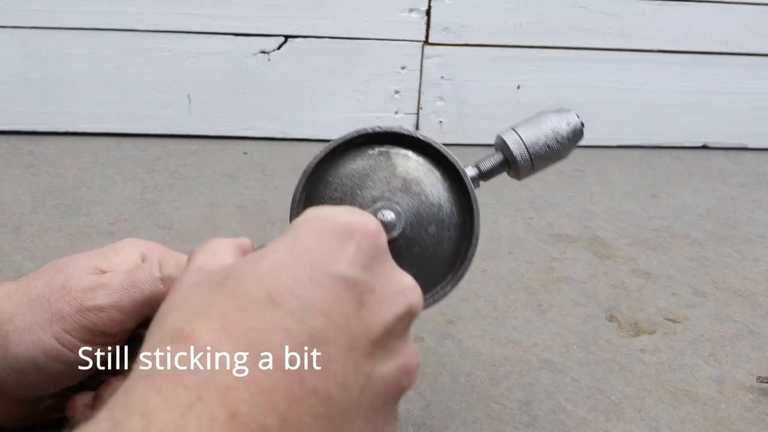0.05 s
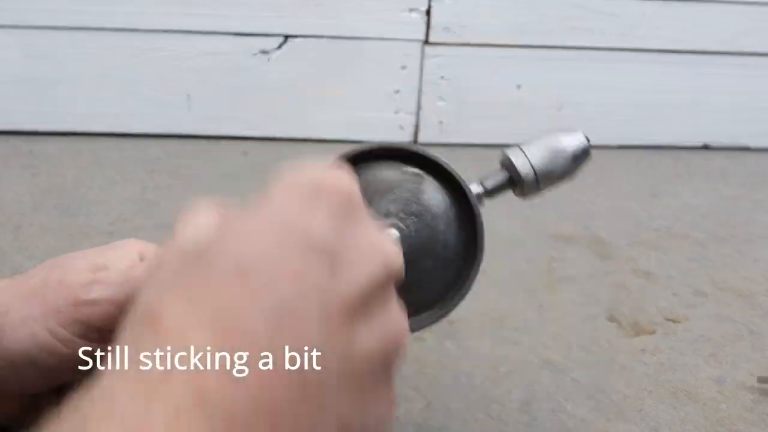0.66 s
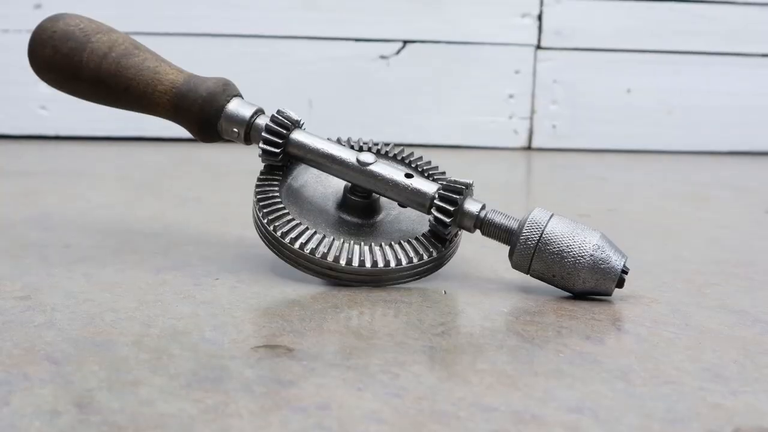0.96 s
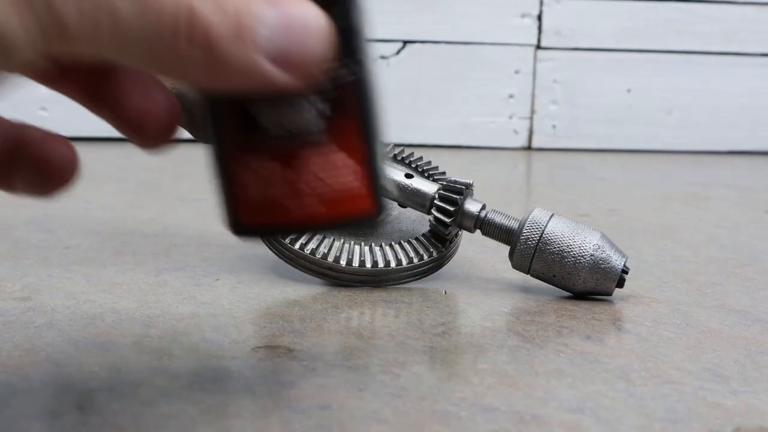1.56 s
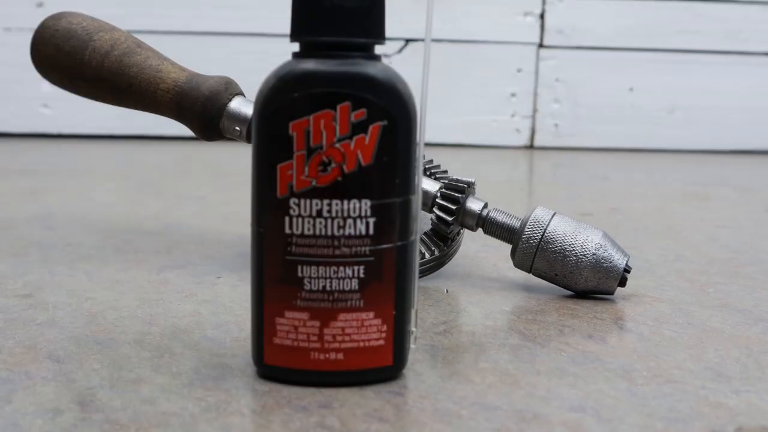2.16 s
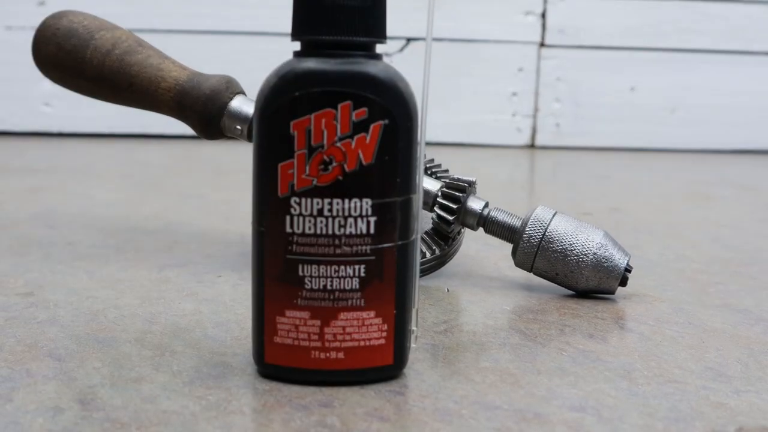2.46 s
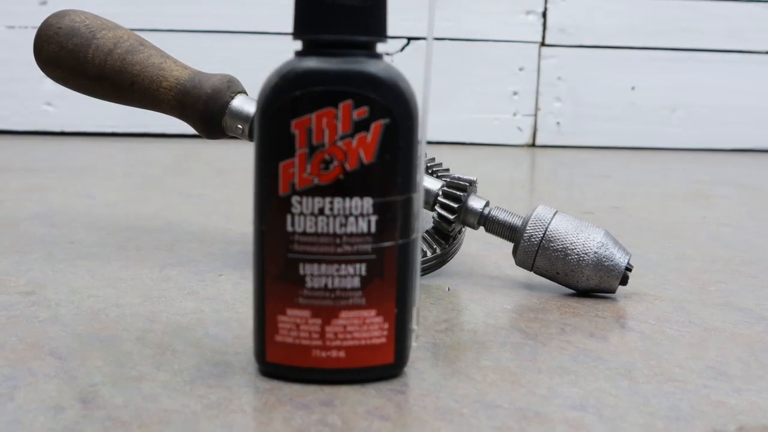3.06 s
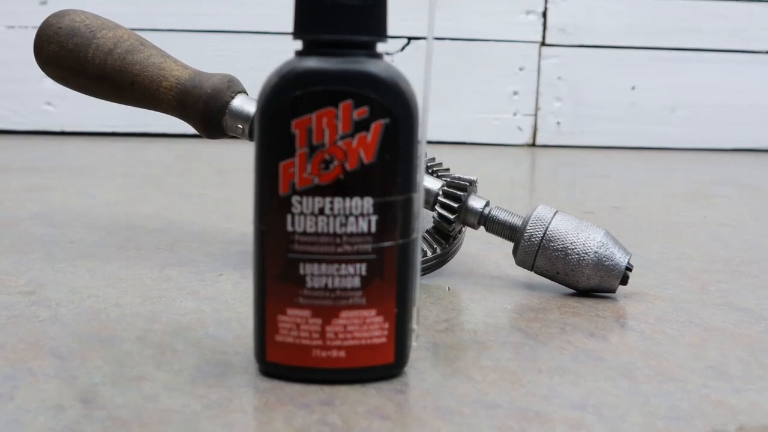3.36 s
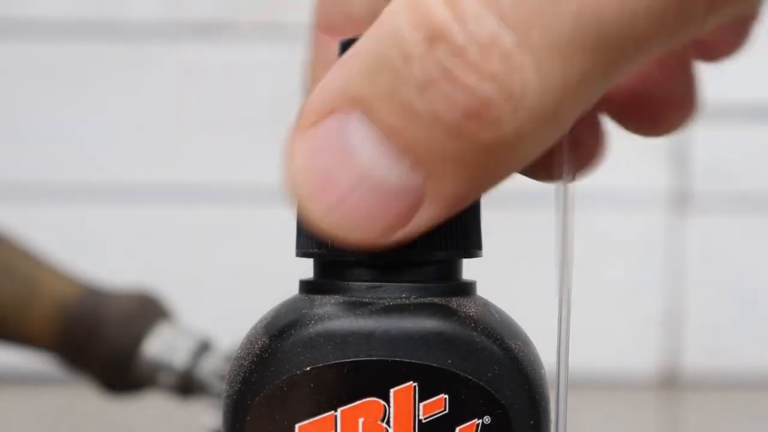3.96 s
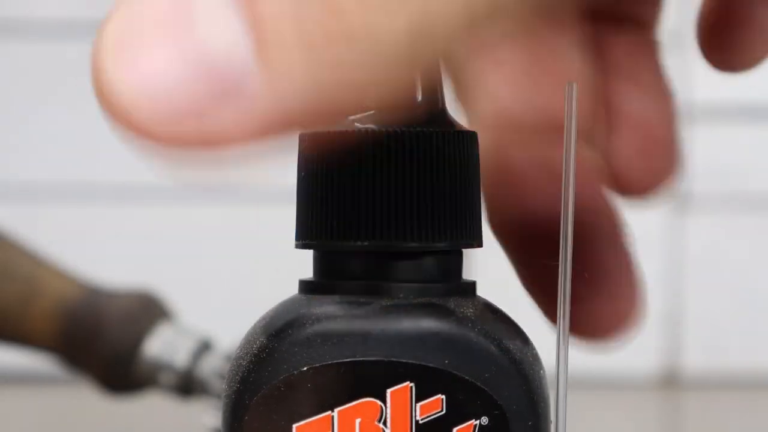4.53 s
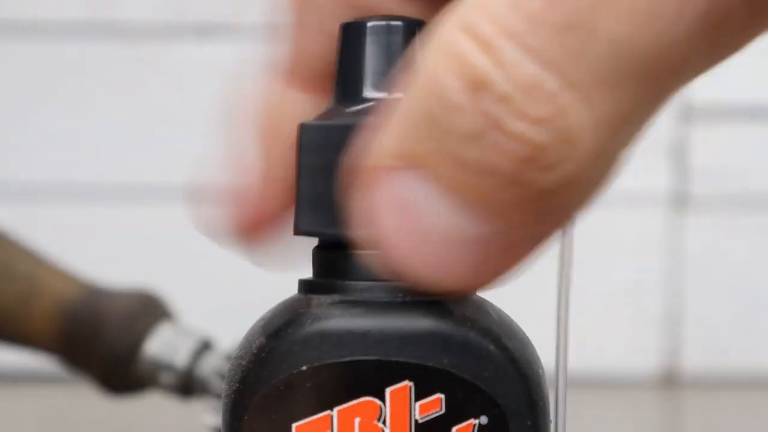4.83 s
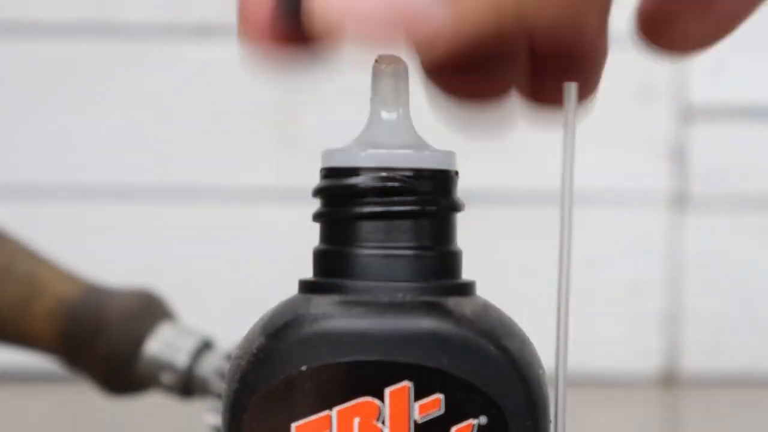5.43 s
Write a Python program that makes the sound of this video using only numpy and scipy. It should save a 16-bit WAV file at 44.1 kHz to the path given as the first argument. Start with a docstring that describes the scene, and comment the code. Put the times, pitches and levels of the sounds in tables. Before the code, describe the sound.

Close by, the gears of a sticky hand drill whir and clatter for about half a second, with thin squeaks, and stop suddenly. Soft taps come next, then the solid knock of a filled plastic bottle landing on a bench. Fingers then unscrew its cap with a run of short hissing scrapes and small plastic clicks, over a low electrical hum and the faint hiss of a small, quiet room.

```python
"""In a small workshop, a sticky hand drill is cranked up close: its bevel gears rattle and squeak,
until the drill sound cuts off abruptly and the background hiss steps up. After a few faint handling
noises a plastic oil bottle is set down on a hard bench, its body and thin wall ringing as it rocks.
A hand grips it, a mains hum sets in, and the fingers spin the ribbed cap off in quick flicks,
skin hissing on the ribs and the cap clicking."""
import sys
import numpy as np
from scipy import signal
from scipy.fft import rfft, irfft, next_fast_len
from scipy.io import wavfile
from scipy.ndimage import map_coordinates

SR = 44100
rng = np.random.default_rng(int(sys.argv[2]) if len(sys.argv) > 2 else 0)


def store_pcm(level_fs):
    """Save levels as 16-bit WAV."""
    pcm = np.round(np.clip(level_fs, -1, 1) * 32767).astype(np.int16)
    wavfile.write(sys.argv[1], SR, np.atleast_2d(pcm).T)


N = 246519
TIME = np.arange(N) / SR
AGE = TIME[:SR // 3]  # seconds since a hit
CUT_S, GRIP_S = 0.758, 3.53

# Tone of a hard contact. Each row: frequency in Hz, gain in dB.
TICK_EQ = [(30, -42.5), (200, -15), (1000, 7), (4000, -0.5), (7000, -6.5), (9000, -9.5), (11500, 0),
           (16000, -16)]
# Tone of the workshop's reverb. Each row: frequency in Hz, gain in dB.
ROOM_EQ = [(60, -8.5), (300, 1), (600, 4.5), (1200, 1.5), (2400, 0.5), (4500, -4.5), (7000, -7),
           (8500, -13.5), (15000, -23)]


def amp(db):
    """Decibels to gain."""
    return 10 ** (np.asarray(db) / 20)


def unit(x):
    """Scale to rms 1."""
    return x / np.sqrt(np.mean(x ** 2) + 1e-20)


def noise(samples=N):
    """White noise."""
    return rng.standard_normal(samples)


def along(points, hz):
    """Read (Hz, value) points on a log frequency axis."""
    freqs, values = np.transpose(points)
    return np.interp(np.log(hz + 1), np.log(freqs + 1), values)


def add(track, start, sound):
    """Mix a sound into the track at start seconds."""
    part = track[round(start * SR):][:len(sound)]
    part += sound[:len(part)]


def filtered(x, response):
    """Apply a complex frequency response."""
    size = 2 * next_fast_len(len(x) // 2 + 8192)
    return irfft(rfft(x, size) * response(np.fft.rfftfreq(size, 1 / SR)), size)[:len(x)]


def eq(x, points):
    """Minimum-phase EQ through (Hz, dB) points."""
    def response(hz):
        cepstrum = irfft(np.log(amp(along(points, hz))))
        half = len(cepstrum) // 2
        return np.exp(rfft(np.r_[cepstrum[0], 2 * cepstrum[1:half], np.zeros(half)]))
    return filtered(x, response)


def resonant(x, modes):
    """Parallel (Hz, width in Hz, dB) resonances of alternating polarity."""
    return filtered(x, lambda f: sum((-1) ** k * amp(db) * 1j * f * bw / (hz * hz - f * f + 1j * f * bw)
                                     for k, (hz, bw, db) in enumerate(modes)))


def impacts(rate, scatter, spread_db, life):
    """Noise bursts of uneven size and timing, rate a second, each decaying over life seconds."""
    beats = np.flatnonzero(np.diff(np.floor(np.cumsum(rate) / SR)))
    timing, strength = rng.standard_normal((len(beats), 2)).T
    hits = np.clip(beats + scatter * timing * SR / rate[beats], 0, N - 1).astype(int)
    sizes = np.bincount(hits, amp(spread_db * np.clip(strength, -2, 2)), N)
    envelope = signal.lfilter([1], [1, -np.exp(-1 / (life * SR))], sizes)
    return unit(envelope * noise())


def ring(modes, vary_db):
    """One blow on (Hz, dB, T60) modes, each at a random strength; peak 1."""
    x = sum((-1) ** k * amp(db + vary_db * rng.normal() - 60 * AGE / t60) * np.sin(2 * np.pi * hz * AGE)
            for k, (hz, db, t60) in enumerate(modes))
    return x / np.abs(x).max()


def crack(tone, life):
    """A sharp blow drives many close modes about equally hard, and they die together."""
    spectrum = rfft(noise(len(AGE)) * np.exp(-AGE / life))
    flat = irfft(spectrum / np.abs(spectrum), len(AGE)) * np.exp(-AGE / (10 * life))
    burst = eq(flat, tone)
    return burst / np.sqrt(np.sum(burst ** 2)) * np.sqrt(life * SR / 8)


def room(x):
    """The workshop's reverb: each frequency dies at its own speed."""
    # Reverb decay. Each row: frequency in Hz, T60 in seconds.
    decay = [(100, 0.74), (400, 0.46), (1000, 0.5), (2500, 0.49), (5000, .38), (12000, 0.251)]
    hz, t, bands = signal.stft(noise(SR * 2 // 3), SR, nperseg=256)
    tail = signal.istft(bands * amp(-60 * t / along(decay, hz)[:, None]), SR, nperseg=256)[1]
    tail *= 1 - np.exp(-(TIME[:len(tail)] / 0.0044) ** 2)  # soft onset
    return signal.fftconvolve(x, eq(tail / np.linalg.norm(tail), ROOM_EQ))[:N]


def room_tone():
    """A low bed of background hiss that steps up at CUT_S."""
    # Tone of the air. Each row: frequency in Hz, gain in dB.
    air_eq = [(15, -42.5), (25, -17), (64, -4.5), (152, -9), (253, -14.5), (281, -14.5), (340, -13),
              (399, -22.5), (445, -20), (1300, -26), (2920, -29.5), (3440, -29.5), (15500, -36)]
    return amp(np.where(TIME < CUT_S, -63, -52)) * unit(eq(noise(), air_eq))


def mains_hum():
    """A trace of mains swells to a full hum once the hand is on the bottle."""
    # Mains harmonics. Each row: frequency in Hz, rms level in dB.
    harmonics = [(60, -37.5), (120, -45.5), (180, -61), (300, -59.5), (360, -66), (420, -63)]

    def tone(hz, db):
        return amp(db) * np.sqrt(2) * np.sin(2 * np.pi * hz * TIME)
    gripped = np.clip((TIME - GRIP_S) / 0.025, 0, 1)
    return (1 - gripped) * tone(60, -60.5) + gripped * sum(tone(hz, db) for hz, db in harmonics)


def handling():
    """Light taps further off, with their reverb, and the faint rustle of a sleeve."""
    # Things touched. Each row: start in seconds, scuff level in dB, ring pitch in Hz,
    # ring level in dB over the scuff, T60 in seconds, attack in seconds.
    touches = [(1.092, -49, 907.5, 13, 0.0446, 0.00108), (1.243, -45.5, 306.4, 7, 0.0615, 0.00047),
               (1.385, -33.5, 1208, -27, .17, .005), (2.794, -55, 221.7, 17.5, 0.0396, 0.0017)]
    # Tone of scuffs and cloth. Each row: frequency in Hz, gain in dB.
    scuff_eq = [(290, -30.5), (500, -17), (1150, -4), (1880, -12), (3570, -3.5), (4220, -12.5), (5130, -13),
                (6690, -27.5), (14000, -30.5)]
    taps = np.zeros(N)
    for start, db, hz, ring_db, t60, attack in touches:
        scuff = unit(eq(noise(len(AGE)), scuff_eq))
        envelope = amp(db - 60 * AGE / t60) * (1 - np.exp(-(AGE / attack) ** 2))
        add(taps, start, envelope * (scuff + amp(ring_db) * np.sin(2 * np.pi * hz * AGE)))
    sleeve = amp(-61) * np.exp(-((TIME - 2.38) / 0.16) ** 2) * unit(eq(noise(), scuff_eq))
    return taps + sleeve + amp(-5.5) * room(taps)


def stroke(touch, slip, swell_db, attack, release):
    """Envelope of a finger stroke: it swells as the finger speeds up, and dies after the slip."""
    progress = np.clip((TIME - touch) / (slip - touch), 0, 1)
    rise = 1 - np.exp(-np.maximum(TIME - touch, 0) / attack)
    fall = np.exp(-np.maximum(TIME - slip, 0) / release)
    return rise * amp(swell_db * (progress - 1)) * fall


def scrape(centre, hz, width):
    """A brief swell of noise in one resonance; width is bandwidth over pitch."""
    half_length_s = 0.007
    track, band = np.zeros(N), [(hz, width * hz, 0)]
    pitched = unit(resonant(resonant(noise(len(AGE)), band), band))
    add(track, centre - 3 * half_length_s, pitched * np.exp(-(AGE / half_length_s - 3) ** 2))
    return track


def cap():
    """Skin hisses over the ribs and stirs the hollow cap, which clicks at each touch and as it turns."""
    # A finger lands, slides and slips off. Each row: touch and slip times in seconds, relative
    # levels in dB of touch click, slide hiss, cap body and slip hiss, slip pitch in Hz.
    flicks = [(3.651, 3.747, -39.5, -43, -45, -36.5, 7985), (4.044, 4.099, -52, -45.5, -42.5, -51.5, 9140),
              (4.12, 4.133, -47.5, -48, -37.5, -38.5, 3480), (4.369, 4.430, -28.5, -36, -37, -31.5, 11120),
              (4.667, 4.717, -29, -34.5, -33, -33.5, 5093), (4.925, 4.968, -32, -37, -34.5, -36.5, 5472),
              (5.155, 5.226, -29, -37.5, -37, -28.5, 3116), (5.448, 5.505, -13, -47.5, -31.5, -48.5, 4084)]
    # The cap clicks as the hand touches it and as it turns.
    # Each row: start in seconds, ring level in dB, snap level in dB.
    cap_clicks = [(3.53, -19, -24), (3.739, -32.5, -25), (4.092, -28, -39), (4.132, -29, -23.5),
                  (4.336, -42, -31.5), (4.4327, -14, -6.5), (4.4377, -12, -12.5), (4.474, -25, -21),
                  (4.729, -22.5, -21.5), (4.965, -26, -21), (4.9864, -25.5, -19.5), (5.231, -25.5, -22),
                  (5.41, -28, -29), (5.501, -20.5, -27.5), (5.512, -25.5, -22.5)]
    # Brief pitched scrapes, and the bright ring of the loudest cap snap.
    # Each row: centre in seconds, pitch in Hz, level in dB.
    accents = [(3.74, 884, -32.5), (4.103, 727, -38.5), (4.433, 4770, -26), (5.282, 1139, -37)]
    # Modes of cap and neck. Each row: frequency in Hz, relative level in dB, T60 in seconds.
    cap_modes = [(619.6, -3, 0.0309), (813.5, -1.5, 0.0204), (925.4, -1, 0.0377), (1085.3, -6.5, 0.0513),
                 (1248, -1.5, 0.0353), (1476, -7, 0.0222), (1738.7, -11, 0.042)]
    # Tones of skin, hollow cap and stiff cap wall. Each row: frequency in Hz, gain in dB.
    skin_eq = [(1500, -26.5), (3500, 5), (5500, 0.5), (7500, -1.5), (10000, -4), (13500, -2), (16000, -8.5)]
    hollow_eq = [(150, -30), (300, 0.5), (450, -6), (650, -3.5), (1100, -3), (1700, -8.5), (2600, -6.5),
                 (3800, -9.5), (6000, -33)]
    snap_eq = [(60, -34.5), (600, 18), (1500, -7.5), (2400, 6), (3000, 0), (3700, 0), (5000, -1),
               (6200, -7), (9000, -20.5), (15500, -29)]
    ribs = impacts(np.full(N, 400), scatter=0.29, spread_db=2.5, life=0.0017)
    stick_slip = impacts(np.full(N, 160), scatter=0.3, spread_db=2.5, life=0.0008)  # on the thread
    rubbing = noise() + amp(-4) * ribs
    hiss_gain, body_gain, bright = np.zeros((3, N))
    clicks = list(cap_clicks)
    for touch, slip, touch_db, slide_db, body_db, slip_db, slip_hz in flicks:
        hiss_gain += amp(slide_db) * stroke(touch, slip, swell_db=8, attack=0.005, release=0.009)
        body_gain += amp(body_db - 2) * stroke(touch, slip, swell_db=2, attack=0.0026, release=0.028)
        bright += amp(slip_db) * scrape(slip, slip_hz, width=0.8)
        nail = amp(slide_db + 1.5) * crack(TICK_EQ, life=0.00136)
        add(bright, touch - 0.015, nail)  # grazes just ahead of the slide
        clicks.append((touch, touch_db, touch_db))
    bright += hiss_gain * unit(eq(rubbing, skin_eq))
    hollow = body_gain * unit(eq(amp(-5) * ribs + amp(-8) * stick_slip, hollow_eq))
    for centre, hz, db in accents:
        bright += amp(db) * scrape(centre, hz, width=0.413)
    for start, ring_db, snap_db in clicks:
        add(hollow, start, amp(ring_db) * ring(cap_modes, vary_db=2.5))
        add(bright, start, amp(snap_db) * crack(snap_eq, life=0.0027))
    return hollow + bright + room(amp(-12.5) * hollow + amp(-15.5) * bright)


def bottle():
    """Each contact ticks, rings the bottle's body and wall, and thumps the bench, which rings on."""
    # The bottle lands, is gripped and tips back. Each row: start in seconds, then levels in dB
    # of body, wall, tick and thump.
    contacts = [(1.8, -2, -0.5, -2, -12.5), (3.53, -23, -20, -2.5, -13), (4.436, -19, -20, -26, -16)]
    # Modes of the filled bottle. Each row: frequency in Hz, relative level in dB, T60 in seconds.
    body_modes = [(262.9, -6, .15), (306.6, -1.5, .12), (387, -1, 0.061), (457.4, -6, .06),
                  (505.5, -2.5, 0.069), (613.2, -6.5, .05), (704, -1.5, .05), (779, -5, .036),
                  (888, -6, .04), (1076, -9, .035), (1243.6, -7, 0.038)]
    # Crowded modes of the thin plastic wall. Each row: frequency in Hz, gain in dB.
    wall_eq = [(50, -53.5), (200, -11), (400, -9.5), (700, -7), (1300, -6.5), (1750, -5.5), (2170, 4),
               (2480, 0.5), (2800, -13), (3800, -3.5), (5600, -8), (7000, -18.5), (15000, -35.5)]
    swell = AGE / 0.0011
    push = np.sin(2 * np.pi * 300 * AGE) * swell * np.exp(1 - swell)
    bench = amp(-17.5 - 60 * AGE / 0.38) * np.sin(2 * np.pi * 288.9 * AGE)
    # After landing it rocks twice, each contact one step later and softer.
    rock_step = np.array([0.0102, -12, -12, -9, -12])
    rocking = [np.array(contacts[0]) + k * rock_step for k in (1, 2)]
    knocks, ticks = np.zeros((2, N))
    for start, body_db, wall_db, tick_db, thump_db in list(contacts) + rocking:
        body = amp(body_db) * ring(body_modes, vary_db=2)
        wall = amp(wall_db) * crack(wall_eq, life=0.00548)
        add(knocks, start, body + wall + amp(thump_db) * (push + bench))
        add(ticks, start, amp(tick_db) * crack(TICK_EQ, life=0.001))
    send = knocks + amp(-11) * ticks  # small, close ticks hardly stir the room
    return knocks + ticks + amp(-10) * room(send)


def gear_force():
    """Teeth strike the two pinions and rub between blows; now and then one binds and jumps."""
    # Effort on the crank. Each row: time in seconds, relative level in dB.
    cranking = [(0.29, -49), (0.348, -11), (0.53, -16), (0.624, -13.5), (0.634, -18.5), (0.664, -13.5),
                (0.678, -19), (0.755, -19.5)]
    # Crank speed. Each row: time in seconds, teeth per second.
    speed = [(.27, 92.3), (.35, 206.2), (.5, 200), (.62, 315), (.75, 200.5)]
    # Hardest jumps of a binding tooth. Each row: start in seconds, relative level in dB.
    jolts = [(.3204, -14), (0.3451, 0.5), (.3673, 4.5), (.3821, -2.5), (.4325, -0.5), (.5067, -1.5),
             (.5594, -1.5), (.5795, 1.5), (.6014, -1.5), (.619, -2.5), (.6993, -8)]
    times, effort_db = np.transpose(cranking)
    outside_s = np.maximum(times[0] - TIME, 0) + np.maximum(TIME - times[-1], 0)
    effort = amp(np.interp(TIME, times, effort_db)) * np.exp(-outside_s / 0.0082)
    rate = np.interp(TIME, *np.transpose(speed))
    driven = impacts(rate, scatter=0.08, spread_db=1, life=0.0007)
    idler = impacts(rate, scatter=0.64, spread_db=4, life=0.0016)
    teeth = unit(driven + amp(-1) * idler + amp(0.5) * noise())
    # Dry gears bind and free up: a smooth wobble, 70 changes a second.
    binding_db = 1.857 * map_coordinates(noise(4096), [TIME * 70], mode="wrap")
    force = effort * teeth * amp(binding_db - 1.5)
    for start, db in jolts:
        add(force, start, amp(db - 7) * np.exp(-AGE / 0.0044) * noise(len(AGE)))
    return force, teeth, effort


def drill():
    """The gear teeth click and ring the steel, the dry spindle squeaks and the loose crank clanks."""
    # Modes of wheel, pinions and frame. Each row: frequency in Hz, width in Hz, relative gain in dB.
    gear_modes = [(335.3, 40, -25.5), (2717.5, 73, -16.5), (3528, 250, -5), (3665.4, 110, 0.5),
                  (3811, 76, 0.5), (4090, 130, -0.5), (4451, 860, -8), (4747, 500, -4.5),
                  (5170, 560, -11.5), (6466, 680, -18), (6896, 260, -15.5), (10198, 1200, -19.5),
                  (10529, 300, -19)]
    # Dry click of a tooth. Each row: frequency in Hz, gain in dB.
    tooth_eq = [(60, -33.5), (200, -17.5), (330, -5.5), (650, 0), (1300, -6.5), (2200, 0), (5000, -1),
                (8300, -9), (10500, 0), (12000, -0.5), (15500, -9)]
    # Spindle squeaks. Each row: start in seconds, pitch in Hz, level in dB, rise in seconds.
    squeaks = [(.538, 11070, -20.5, .003), (.538, 15100, -28.5, .002), (.582, 6900, -16, .011)]
    # The crank takes up its slack. Each row: start in seconds, ring level in dB, tick in dB over it.
    slack = [(.232, -42, -9), (.2528, -13, -9), (.311, -17, -6.5), (.321, -20.5, 1.5)]
    # Modes of the loose crank. Each row: frequency in Hz, relative level in dB, T60 in seconds.
    crank_modes = [(685.1, -7, 0.0079), (2000, -9, .014), (2850.8, -11, .04), (3450, -2, .014),
                   (3834.6, -3, .012), (4544, -6.5, .014), (5420, -8.5, .012), (7140, -14, .025),
                   (10550, -26, .04)]
    force, teeth, effort = gear_force()
    steel = resonant(force, gear_modes) / np.std(resonant(teeth, gear_modes))
    clatter = eq(amp(-12) * force + amp(-14.5) * effort * noise(), tooth_eq)
    for start, hz, db, rise in squeaks:
        waver = 0.2 * np.cumsum(noise())
        swell = np.maximum(TIME - start, 0) / rise
        steel += amp(db) * swell * np.exp(1 - swell) * np.sin(2 * np.pi * hz * TIME + waver)
    for start, db, tick_db in slack:
        clank = ring(crank_modes, vary_db=3) + amp(tick_db) * crack(TICK_EQ, life=0.0014)
        add(steel, start, amp(db) * clank)
    direct = steel + clatter
    reverb = amp(-13) * room(direct)
    # A fading wash opens the scene: the room still rings with an earlier turn of the crank.
    hiss = noise()
    wash = unit(resonant(hiss, gear_modes)) + amp(-3.5) * hiss
    lingering = amp(-46.5 - 60 * TIME / 0.6) * unit(eq(wash, ROOM_EQ))
    gate = np.clip((CUT_S - TIME) / 0.001, 0, 1)  # cuts off abruptly, reverb and all
    return (direct + reverb + lingering) * gate


def scene():
    """All sources in one mono mix."""
    return (drill() + bottle() + cap() + handling() + room_tone() + mains_hum())[None]


def record(dry):
    """Soft-clip the loudest peaks and cut the very top of the treble."""
    clipped = dry[0] / (1 + np.abs(dry[0]) ** 8) ** (1 / 8)
    return filtered(clipped, lambda hz: hz < 15950)[None]


dry = scene()
out = record(dry)
store_pcm(out)
```